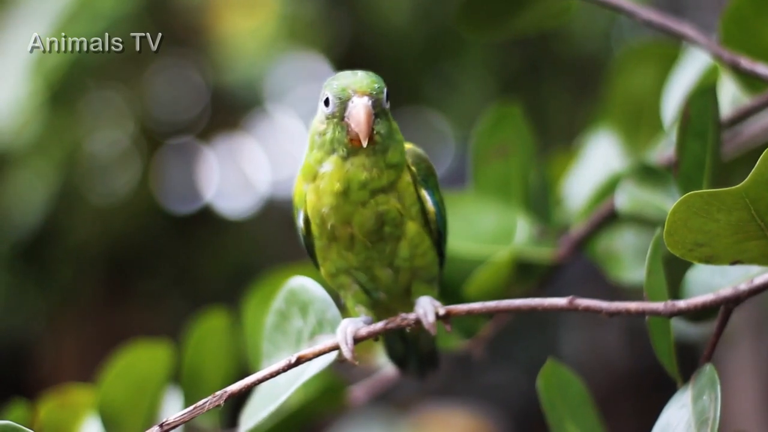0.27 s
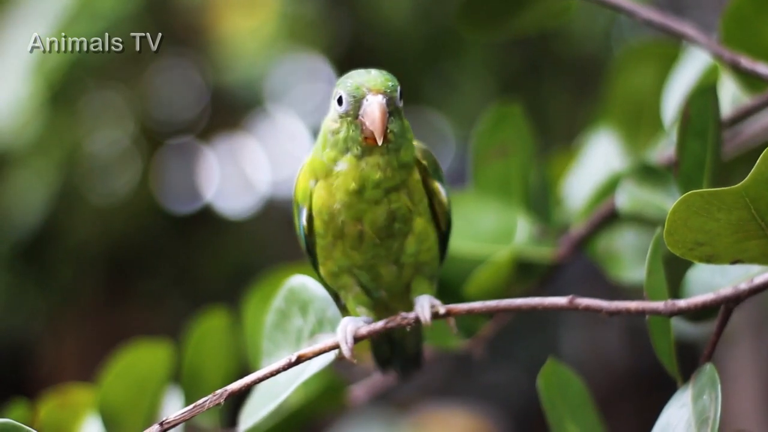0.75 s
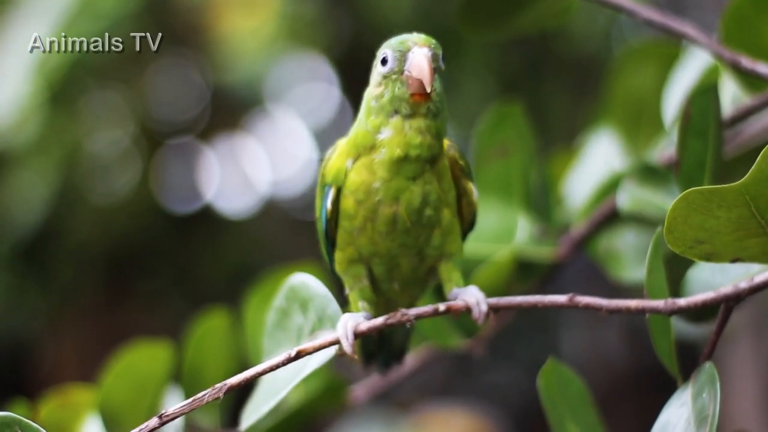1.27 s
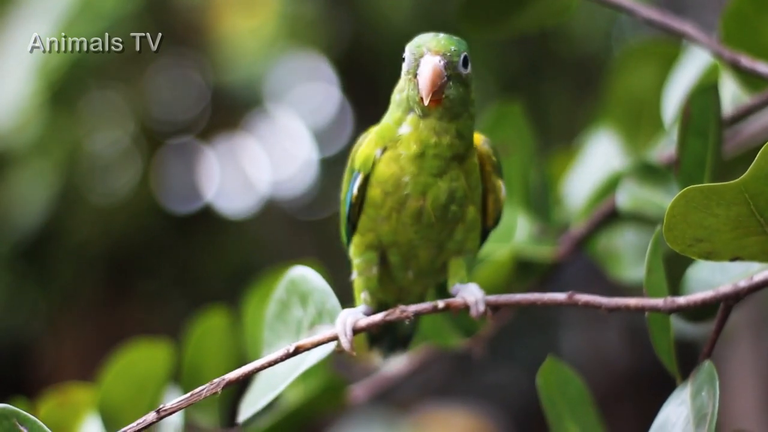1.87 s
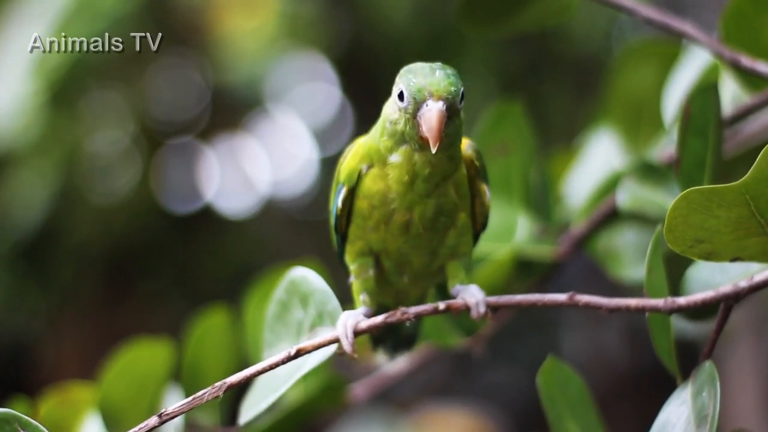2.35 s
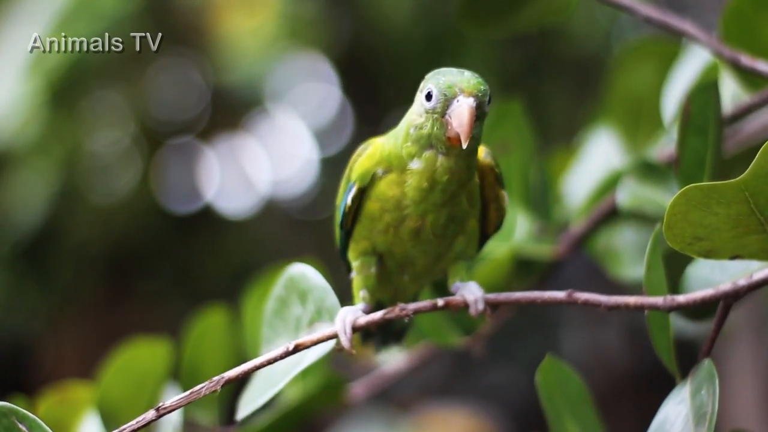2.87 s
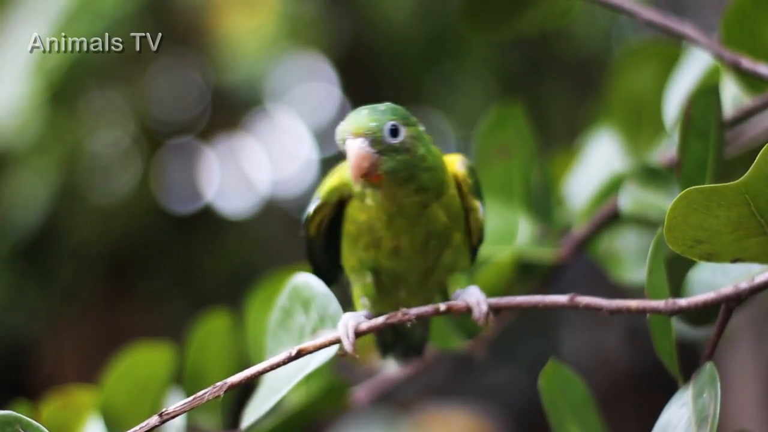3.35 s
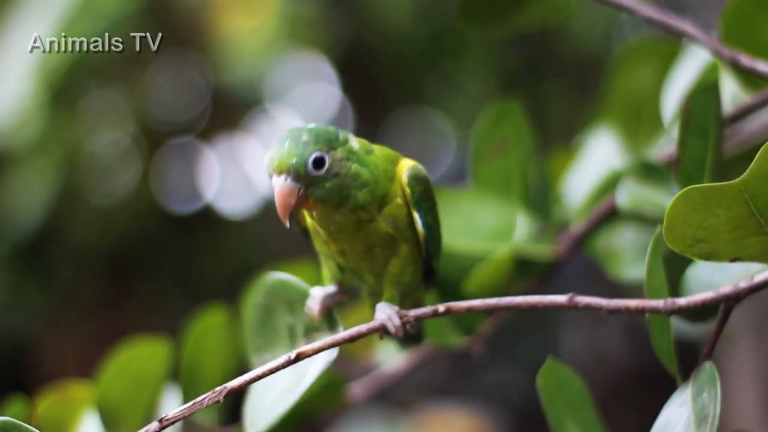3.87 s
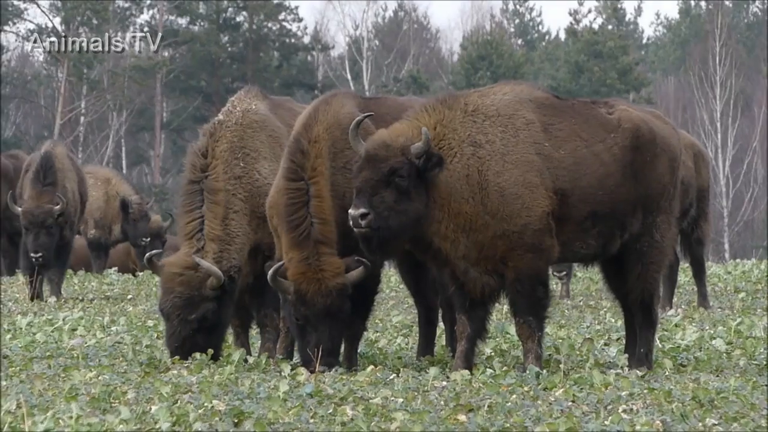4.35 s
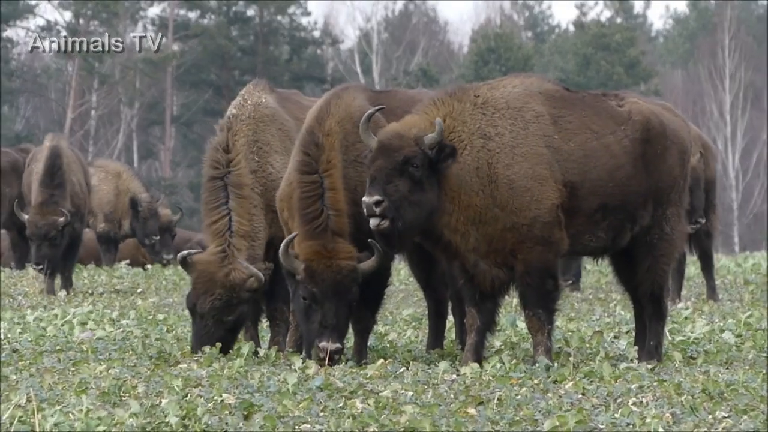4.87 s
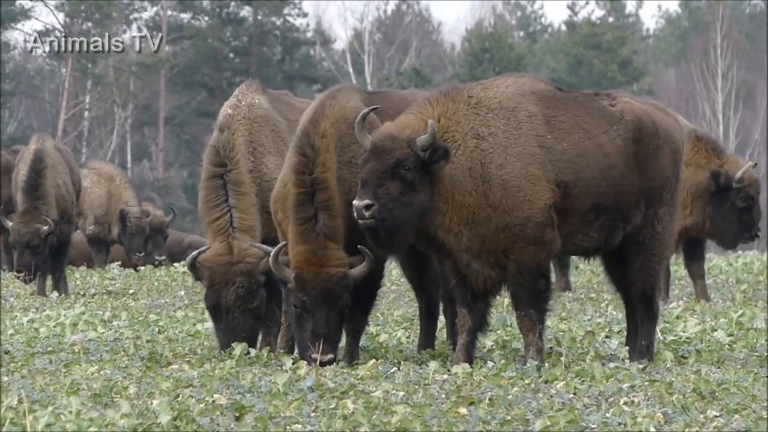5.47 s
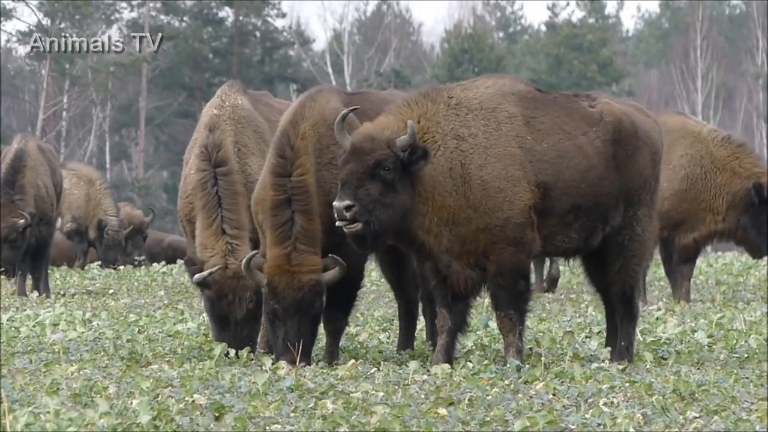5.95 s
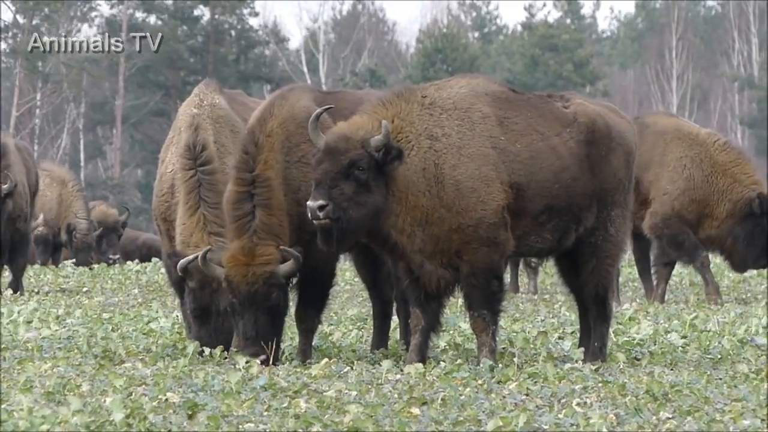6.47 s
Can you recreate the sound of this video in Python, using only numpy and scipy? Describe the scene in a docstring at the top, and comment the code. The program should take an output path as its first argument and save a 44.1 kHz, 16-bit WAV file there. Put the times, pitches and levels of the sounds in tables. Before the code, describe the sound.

Steady leafy hiss with echoing bird whistles cuts to short low wind, then near silence broken by a soft rattling bison grunt and a loud cracking growl.

```python
"""Forest birds, then a grunting bison

Birds whistle and rasp in an echoing, hissing forest; it cuts abruptly to a short rush of wind, then a quiet field.
There a bison grunts twice: a soft rattle, then a loud growl that cracks at its peak through hard clipping.
Each grunt is a slow train of vocal-fold slaps ringing a long throat, plus noise for the rushing air.
Stems, steps and a mouth knock are damped bursts, whistles gliding sines; hiss, wind and field are coloured noise."""
import sys
import numpy as np
from scipy import signal
from scipy.fft import rfft, irfft
from scipy.io import wavfile
from scipy.ndimage import uniform_filter1d

SR = 44100
rng = np.random.default_rng(int(sys.argv[2]) if len(sys.argv) > 2 else 0)


def put_to_file(sound):
    """Save the sound as 16-bit audio at rate SR, in the file named by the first command-line argument."""
    columns = np.atleast_2d(sound).T  # one column per channel
    safe = np.clip(columns, -1, 1)
    whole_steps = np.round(safe * 32767)
    wavfile.write(sys.argv[1], SR, whole_steps.astype(np.int16))


N = 296079
T = np.arange(N) / SR


def amp(db):
    """Decibels to gain."""
    return 10 ** (np.asarray(db) / 20)


def unit(x):
    """Scales to rms 1."""
    return x / np.sqrt(np.mean(x ** 2) + 1e-20)


def follow(rows, t=T):
    """Reads every column of a curve table at the times t."""
    s, *columns = np.transpose(rows)
    return [np.interp(t, s, c) for c in columns]


def read(points, hz):
    """Reads a spectrum on a log-frequency axis."""
    f, value = np.transpose(points)
    return np.interp(np.log(hz + 1), np.log(f + 1), value)


def add(mix, s, sound):
    """Mixes a sound in at time s."""
    part = mix[..., round(s * SR):][..., :sound.shape[-1]]
    part += sound[..., :part.shape[-1]]


def between(start_s, end_s):
    """Gate open from start to end, with 2 ms edges."""
    return np.clip(np.minimum(T - start_s, end_s - T) / .002, 0, 1)


def held(t, top_db, from_s, until_s, rise_db_per_s, fall_db_per_s):
    """Level curve: climbs to the top, holds, then falls."""
    return top_db - rise_db_per_s * np.maximum(from_s - t, 0) - fall_db_per_s * np.maximum(t - until_s, 0)


def noise(spectrum):
    """Steady noise of a given colour."""
    colour = amp(read(spectrum, np.fft.rfftfreq(N, 1 / SR)))
    return unit(irfft(rfft(rng.standard_normal(N)) * colour, N))


def smooth_noise(samples):
    """Slow random curve of rms 1: noise under a moving average."""
    return unit(uniform_filter1d(rng.standard_normal(N), size=samples))


def band(x, lo_hz, hi_hz, order=2):
    """Band-pass."""
    edges_hz = [lo_hz, min(hi_hz, SR / 2 - 100)]
    return signal.sosfilt(signal.butter(order, edges_hz, "band", fs=SR, output="sos"), x)


def resonate(x, hz, width_hz):
    """Resonance that follows the curve hz, applied twice for steep skirts."""
    turn = np.exp(2j * np.pi * np.cumsum(hz) / SR)
    r = np.exp(-np.pi * width_hz / SR)
    return (turn * signal.lfilter([(1 - r) ** 2], [1, -2 * r, r * r], x / turn)).real


def echoes(x, t60_s):
    """Scattering from tree trunks: sparse reflections that die away."""
    t = T[:2 * SR]
    hits = rng.random(len(t)) < 2000 / SR  # about 2000 reflections per second
    taps = rng.standard_normal(len(t)) * hits * 10 ** (-3 * t / t60_s)
    return signal.fftconvolve(x, taps / np.linalg.norm(taps))[:N]


def snaps(rows):
    """Snaps and soft knocks: quickly dying bursts of uneven cracks."""
    out, t = np.zeros(N), T[:SR // 6]
    for s, db, lo_hz, hi_hz, decay_s in rows:
        cracks = rng.standard_normal(len(t)) * rng.random(len(t))
        gain = amp(db) / band(cracks, lo_hz, hi_hz).std()
        add(out, s, gain * band(cracks * np.exp(-t / decay_s), lo_hz, hi_hz))
    return out


def glides(rows):
    """Short pure tones that swell, glide and fade."""
    out = np.zeros(N)
    for s, length_s, start_hz, end_hz, db in rows:
        n = int(length_s * SR)
        phase = 2 * np.pi * np.cumsum(np.linspace(start_hz, end_hz, n)) / SR
        add(out, s, amp(db) * np.hanning(n) * np.sin(phase))
    return out


BOOM_JITTER = .025  # rms share by which the lowest resonance varies per slap
RING_SHAPE = 1.25  # exponent of the ring's decay
RAGGED_S = .006  # decay of the ragged fold contact
CHEST_HZ, CHEST_S = 108, .008
MOUTH_HZ = (820, 1330)  # band that the mouth lets out best
LEAD_S = .015  # each slap's waveform starts this early


def grunt(rate, course, airflow, throat, air_colour, second_width_hz, second_air_db, scatter, closing_s,
          contact_s, mouth_delay_s, overtone_db, chest_db, rebound, ragged, puff_depth, puff_lead_cycles,
          puff_sharpness, buzz, grain_db):
    """Slaps ring the throat until the next one damps it; air puffs through, chopped by the ringing."""
    start_s, end_s = rate[0][0], rate[-1][0]
    cycles = np.cumsum(follow(rate)[0] * (T >= start_s) * (T < end_s)) / SR
    slaps_s = T[np.searchsorted(cycles, np.arange(int(cycles[-1]) + 1), side="right")]
    since = T[:SR // 6]
    t = since - LEAD_S
    age, mouth_age = np.maximum(t - contact_s, 0), np.maximum(t - mouth_delay_s, 0)
    out, swing = np.zeros(N), np.zeros(N)

    # each slap also shakes the chest
    chest_fade = np.exp(-(age / CHEST_S) ** 2 - (np.minimum(t, 0) / (CHEST_S / 2)) ** 2)
    chest = amp(chest_db) * np.sin(2 * np.pi * CHEST_HZ * t) * chest_fade
    mode_hz, mode_width_hz, mode_db = np.transpose(throat)[:, :, None]

    for s, period_s in zip(slaps_s, np.diff(slaps_s, append=slaps_s[-1] + .078)):
        db, low_hz, ring_s, second_hz, second_db, mouth_db, tuning = follow(course, s)
        low_hz = low_hz * (1 + BOOM_JITTER * rng.standard_normal())

        # the flow shuts off smoothly and starts the lowest resonance; its lopsided swing adds an octave
        fade = np.exp(-(age / ring_s) ** RING_SHAPE) * (1 + np.tanh(t / closing_s + 1)) / 2
        angle = 2 * np.pi * low_hz * t
        boom = fade * (amp(overtone_db) * np.sin(2 * angle) - np.cos(angle))
        second_fade = np.exp(-np.pi * second_width_hz * age)
        second = amp(second_db) * np.sin(2 * np.pi * second_hz * age) * second_fade

        # the folds meet and ring the upper resonances, never twice alike
        drift, uneven = rng.standard_normal((2, len(mode_hz), 1))
        tuned_hz = mode_hz * tuning * (1 + scatter * drift)
        ring_fade = np.exp(-np.pi * mode_width_hz * mouth_age)
        ring = amp(mode_db + uneven / 2) * np.sin(2 * np.pi * tuned_hz * mouth_age) * ring_fade

        # they touch again, more lightly, on each later swing of the lowest resonance
        swings = np.diff(np.floor(low_hz * since), prepend=0)
        touches = rebound * swings * np.exp(-since / ring_s) * rng.uniform(.5, 1, len(t))
        touches[0] = 1
        # wet folds part and meet raggedly
        rough = unit(rng.standard_normal(len(t))) * np.exp(-since / RAGGED_S)
        touches += ragged * rough / np.sqrt(RAGGED_S * SR / 2)
        mouth = amp(mouth_db) * band(signal.fftconvolve(touches, ring.sum(0))[:len(t)], *MOUTH_HZ)

        damping = (1 - np.tanh((t - period_s) / closing_s + 1)) / 2
        add(out, s - LEAD_S, amp(db) * (chest + (boom + second + mouth) * damping))
        add(swing, s - LEAD_S, boom * damping)

    puff_angle = 2 * np.pi * (cycles + puff_lead_cycles)
    puffs = np.exp(puff_sharpness * (np.cos(puff_angle) - 1)) * between(start_s, end_s)
    grains = amp(grain_db * smooth_noise(130))
    throat_air = unit(resonate(rng.standard_normal(N), follow(course)[3], second_width_hz))
    air = unit((noise(air_colour) + amp(second_air_db) * throat_air) * grains)
    air = air * np.exp(buzz * swing) * (1 + puff_depth * puffs) / (1 + puff_depth / 3)
    return out + amp(held(T, *airflow)) * air


# narrow wheeze that sinks through the growl: (time [s], centre [Hz], level [dB])
WHEEZE_CURVE = [(5.08, 4900, -80), (5.12, 4850, -70), (5.16, 4650, -67), (5.24, 4600, -78)]
WHEEZE_WIDTH_HZ = 600  # of each of the two resonator passes


def wheeze():
    """Air whistles roughly through a narrow gap in the muzzle."""
    hz, db = follow(WHEEZE_CURVE)
    whistle = unit(resonate(rng.standard_normal(N), hz, WHEEZE_WIDTH_HZ))
    return amp(db) * whistle * between(WHEEZE_CURVE[0][0], WHEEZE_CURVE[-1][0])


# vocal-fold speed: (time [s], slap rate [1/s])
SOFT_SLAP_RATE = [(4.251, 24.42), (4.33, 29.81), (4.47, 29.15), (4.61, 24.56), (4.69, 19.05), (4.8, 17.55)]
LOUD_SLAP_RATE = [(5.0165, 33.64), (5.06, 53.05), (5.11, 60.92), (5.2, 48.44), (5.305, 39.84),
                  (5.345, 21.72), (5.45, 22.6), (5.55, 13.42), (5.68, 14.02)]
# course of each grunt: (time [s], effort [dB], lowest resonance [Hz], its ring time [s],
# second resonance [Hz], its level re slap [dB], upper resonances re slap [dB], their tuning [ratio])
SOFT_GRUNT_COURSE = [(4.251, -37, 160, .03, 600, -20, -9, 1), (4.29, -36, 168, .02, 620, -20, -7, 1),
                     (4.325, -40, 180, .014, 630, -20, -5, 1), (4.36, -33.5, 180, .009, 640, -20, -8, .95),
                     (4.46, -31.5, 194, .008, 640, -8, -1, 1), (4.57, -29.5, 192, .007, 610, -13, -5, 1.03),
                     (4.61, -28.5, 182, .007, 610, -16, -6, 1), (4.652, -29, 180, .011, 610, -17, -7, 1),
                     (4.702, -36, 175, .012, 620, -19, -7, 1.1),
                     (4.756, -36.5, 172, .02, 620, -24, -11, 1.1)]
LOUD_GRUNT_COURSE = [(5.017, -20, 198, .03, 520, -20, -8, .96),
                     (5.042, -13.5, 198, .014, 522, -16, -4, .98),
                     (5.08, -14.5, 192, .007, 525, -18, 2.5, .99),
                     (5.15, -14.5, 196, .007, 505, -25, 2.5, 1.02),
                     (5.187, -11, 190, .007, 495, -27, 2, 1.03),
                     (5.207, -9.8, 195, .022, 490, -22, 2.5, 1.01),
                     (5.229, -11, 184, .028, 490, -19, 5.5, 1.02),
                     (5.274, -10, 170, .03, 520, -27, 3.5, 1.01), (5.298, -9.5, 165, .022, 540, -32, 0, 1),
                     (5.325, -18, 168, .05, 570, -26, 0, 1), (5.367, -12, 158, .024, 585, -24, -9, .99),
                     (5.412, -22, 140, .05, 585, -26, -3, .96), (5.457, -21, 130, .014, 585, -16, -9, .98),
                     (5.508, -21, 112, .009, 595, -24, -2, .86), (5.576, -33, 100, .008, 600, -26, -16, .9),
                     (5.65, -37, 100, .008, 600, -26, -16, .9)]
# rushing-air level: (held level [dB], from [s], until [s], rise [dB/s], fall [dB/s])
SOFT_AIRFLOW = (-51.5, 4.25, 4.6, 430, 50)
LOUD_AIRFLOW = (-37, 5.03, 5.36, 420, 105)
SIZZLE_AIRFLOW = (-63, 5.35, 5.39, 75, 130)
# upper throat resonances before tuning: (frequency [Hz], width [Hz], relative level [dB])
SOFT_THROAT_MODES = [(1010, 190, 1), (1290, 190, -2.5)]
LOUD_THROAT_MODES = [(945, 45, -18), (1080, 300, -2.8), (1135, 50, -13)]
# colour of air past the folds: (frequency [Hz], relative density [dB])
SOFT_AIR_COLOUR = [(150, -22), (400, -22), (620, -6), (770, -10), (1040, 3), (1400, -1), (1800, 1),
                   (2250, -6), (2750, -12.5), (3300, -13), (4300, -22), (5000, -20), (6500, -35),
                   (12000, -63)]
LOUD_AIR_COLOUR = [(120, -25), (270, 6), (400, 1), (525, -4), (680, -20), (930, 0), (1150, 1), (1380, -11),
                   (1520, -22), (1740, -15), (2000, -26), (2400, -22), (3500, -37), (6000, -56.5),
                   (14000, -74.5)]
# thin hiss between tongue and teeth: (frequency [Hz], relative density [dB])
SIZZLE_COLOUR = [(1500, -23), (3000, 7.5), (3800, 4), (4200, -2), (4700, 1), (5600, -3), (9000, -13),
                 (13000, -15), (15000, -32)]
# throat hums as the folds draw together: (time [s], length [s], start [Hz], end [Hz], level [dB])
THROAT_HUMS = [(4.19, .075, 70, 150, -49), (4.995, .034, 165, 190, -30)]


def bison(echo_db=-31, echo_t60_s=1.5, radiation_hz=50):
    """Two grunts, answered faintly by the edge of the wood."""
    soft = grunt(SOFT_SLAP_RATE, SOFT_GRUNT_COURSE, SOFT_AIRFLOW, SOFT_THROAT_MODES, SOFT_AIR_COLOUR,
                 second_width_hz=40, second_air_db=-10, scatter=.04, closing_s=.002, contact_s=.002,
                 mouth_delay_s=.0012, overtone_db=-40, chest_db=-21, rebound=.4, ragged=.35,
                 puff_depth=1.4, puff_lead_cycles=0.0, puff_sharpness=2.8, buzz=.5, grain_db=2.5)
    loud = grunt(LOUD_SLAP_RATE, LOUD_GRUNT_COURSE, LOUD_AIRFLOW, LOUD_THROAT_MODES, LOUD_AIR_COLOUR,
                 second_width_hz=22, second_air_db=-10, scatter=.012, closing_s=.0011, contact_s=.0008,
                 mouth_delay_s=.0004, overtone_db=-15, chest_db=-17, rebound=.35, ragged=.12,
                 puff_depth=.6, puff_lead_cycles=-.2, puff_sharpness=1.0, buzz=.6, grain_db=1.5)
    sizzle = noise(SIZZLE_COLOUR) * amp(held(T, *SIZZLE_AIRFLOW))
    voice = soft + loud + glides(THROAT_HUMS) + wheeze() + sizzle
    # the mouth is too small to radiate the deepest bass
    voice = signal.sosfiltfilt(signal.butter(2, radiation_hz, "high", fs=SR, output="sos"), voice)
    return voice + amp(echo_db) * echoes(voice, echo_t60_s)


# hoof steps: (time [s], level [dB], thud pitch [Hz], decay [s])
HOOF_STEPS = [(6.114, -38, 620, .0018), (6.362, -41, 160, .011)]


def hooves():
    """Each step is one quickly damped knock on the ground."""
    out, t = np.zeros(N), T[:SR // 6]
    for s, db, hz, decay_s in HOOF_STEPS:
        add(out, s, amp(db) * np.sin(2 * np.pi * hz * t) * np.exp(-t / decay_s))
    return out


# stems and leaves snapping, and the low knock of the mouth opening as the soft grunt starts (4.25 s):
# (time [s], level [dB], lowest [Hz], highest [Hz], decay [s])
CRACKLES_AND_KNOCK = [(3.987, -51, 400, 2800, .003), (4.174, -59, 900, 2600, .005),
                      (4.25, -41, 400, 850, .005), (4.882, -54, 496, 2170, 0.0041),
                      (4.903, -61, 1500, 7060, 0.00091), (6.114, -49, 450, 2800, .006),
                      (6.13, -52, 450, 3300, .007), (6.358, -52, 500, 3200, .012),
                      (6.386, -55, 350, 2800, .009), (6.407, -55, 500, 3000, .005),
                      (6.449, -45.5, 2500, 13000, 0.00048)]


def crackles_and_mouth_knock():
    """Stems and leaves snap as the herd grazes, and the mouth knocks open: short band-limited bursts."""
    return snaps(CRACKLES_AND_KNOCK)


# bird whistles: (time [s], length [s], start [Hz], end [Hz], level before echoes [dB], left re right [dB])
BIRD_WHISTLES = [(0.194, 0.16, 1526, 1772, -42, 6.5), (0.341, .2, 1985, 1990, -31, 3.5),
                 (0.442, 0.13, 2130, 1995, -33.5, 2), (0.629, 0.13, 2325, 2300, -29, 5),
                 (.74, .1, 2300, 2292, -35, 4), (.69, 0.14, 1560, 1355, -41, -3),
                 (1.045, 0.115, 1875, 1915, -28.5, 4), (1.137, 0.078, 1933, 1972, -23.3, 6),
                 (1.255, 0.12, 1752, 1725, -32, -6), (1.45, .1, 1705, 1735, -36, -4),
                 (1.362, .12, 2072, 2123, -25, 1.5), (1.581, 0.09, 2153, 2084, -32, 4.5),
                 (1.82, 0.13, 2740, 2755, -31.5, 8), (1.93, 0.094, 2696, 2650, -36, 1.5),
                 (2.09, .12, 2668, 2620, -38, 1), (2.277, .08, 2115, 2114, -33, 5),
                 (2.347, 0.082, 2034, 2034, -33.5, 4), (2.55, .2, 2110, 2120, -41, 2)]
# raspy calls: (time [s], length [s], centre [Hz], half width [share of centre],
# level before echoes [dB], left re right [dB])
BIRD_RASPS = [(.53, .25, 3900, .07, -33.5, -4), (1.571, .27, 3866, .07, -37, -1),
              (2.501, .29, 3920, .07, -31.5, -2), (2.849, .8, 4900, .07, -43, 1),
              (3.48, .26, 3850, .12, -32.5, -1.5)]


def placed(sound, side_db, lag_samples=4):
    """Pans by level difference; the right channel lags a few samples."""
    return amp([[side_db / 2], [-side_db / 2]]) * [sound[0], np.roll(sound[1], lag_samples)]


def far_bird(call, direct_db, t60_s):
    """A call arrives weakly by the straight path and lingers among the trees."""
    dry_call = band(np.pad(call, (0, N - len(call))), 900, 9000)
    tails = np.array([unit(echoes(dry_call, t60_s)) for ear in range(2)]) * dry_call.std()
    return amp(direct_db) * dry_call + tails


def birds(waver=.011, flutter_db=2.5, whistle_direct_db=-2, rasp_direct_db=-5,
          whistle_t60_s=1.5, rasp_t60_s=1.43):
    """Gliding, nearly pure whistles and short harsh rasps of band-passed noise."""
    out = np.zeros((2, N))
    for s, length_s, start_hz, end_hz, db, side_db in BIRD_WHISTLES:
        n = int(length_s * SR)
        hz = np.linspace(start_hz, end_hz, n) * (1 + waver * smooth_noise(300)[:n])
        flutter = amp(flutter_db * smooth_noise(500)[:n])
        tone = np.sin(2 * np.pi * np.cumsum(hz) / SR) * signal.windows.tukey(n, .5)
        note = amp(db) * unit(flutter * tone)
        add(out, s, placed(far_bird(note, whistle_direct_db, whistle_t60_s), side_db))
    for s, length_s, hz, spread, db, side_db in BIRD_RASPS:
        n = int(length_s * SR)
        rasp = band(rng.standard_normal(N), hz * (1 - spread), hz * (1 + spread))[:n] * np.hanning(n)
        add(out, s, placed(far_bird(amp(db) * unit(rasp), rasp_direct_db, rasp_t60_s), side_db))
    return out


# twig snaps in the forest: (time [s], level [dB], lowest [Hz], highest [Hz], decay [s])
TWIG_SNAPS = [(.672, -25, 1000, 3200, .012), (2.718, -21.5, 2000, 4900, 0.0064)]


def twigs():
    """Snapping twigs: short band-limited bursts."""
    return snaps(TWIG_SNAPS)


# small ticks in the wind: (time [s], level [dB], lowest [Hz], highest [Hz], decay [s])
WIND_TICKS = [(3.714, -35, 380, 700, .008), (3.72, -37, 400, 1300, .045), (3.795, -44, 2950, 3300, .004),
              (3.868, -44, 3960, 4700, 0.0027), (3.913, -48, 7800, 8800, .002), (3.926, -39, 200, 300, .03)]
# small bird in the wind: (time [s], length [s], start [Hz], end [Hz], level [dB])
BIRD_PEEPS = [(3.841, .018, 2650, 2850, -37.5)]


def wind_details():
    """Noise-burst ticks and a gliding bird peep."""
    return snaps(WIND_TICKS) + glides(BIRD_PEEPS)


# wind colour: (frequency [Hz], relative density [dB])
WIND_COLOUR = [(15, -58.5), (25, -25), (86, -2), (176, -3), (264, 1), (354, -8), (769, -11.5),
               (1460, -18.5), (1630, -15.5), (4260, -21), (4870, -23), (8550, -24), (15000, -33)]
RUMBLE_DB, RUSTLE_DB, RUSTLE_FALL_START_S, RUSTLE_FALL_DB_PER_S = -44, -42, 3.73, 50


def wind(split_hz=400):
    """Coloured noise: a rumble that holds while its rustling top fades."""
    air = noise(WIND_COLOUR)
    low = signal.sosfiltfilt(signal.butter(2, split_hz, fs=SR, output="sos"), air)
    rustle_db = RUSTLE_DB - RUSTLE_FALL_DB_PER_S * np.maximum(T - RUSTLE_FALL_START_S, 0)
    return amp(RUMBLE_DB) * unit(low) + amp(rustle_db) * unit(air - low)


# forest air: (frequency [Hz], relative density [dB])
HISS_COLOUR = [(30, -49), (85, -63), (125, -50), (170, -28.5), (250, -15.5), (400, -4.5), (700, -1.5),
               (1100, -0.5), (2200, -1.5), (3500, -3), (5000, -6), (8000, -13), (12000, -22),
               (15000, -33.5)]
# left-right likeness: (frequency [Hz], correlation [-1..1])
HISS_LIKENESS = [(60, .7), (1000, .62), (1400, .5), (1800, .2), (2500, 0), (4500, -.17), (7000, -.04),
                 (15000, 0)]
FOREST_DB, FADE_IN_S, FADE_IN_DB = -29.75, .54, 6.4


def forest_hiss(patchy_db=1.13):
    """Distant leaves: wide, slightly patchy noise, alike in both channels mainly at long wavelengths."""
    frames, hz = N // 256 + 5, np.fft.rfftfreq(1024, 1 / SR)
    a, b, c, d, patches = rng.standard_normal((5, frames, len(hz)))
    same = read(HISS_LIKENESS, hz)
    left = a + 1j * b
    right = same * left + np.sqrt(1 - same ** 2) * (c + 1j * d)
    patches = unit(uniform_filter1d(uniform_filter1d(patches, size=14, axis=0), size=14, axis=1))
    spectra = np.array([left, right]) * amp(read(HISS_COLOUR, hz) + patchy_db * patches)
    hiss = unit(signal.istft(spectra.swapaxes(1, 2), nperseg=1024, noverlap=768)[1][:, :N])
    return hiss * amp(FOREST_DB - FADE_IN_DB * np.maximum(1 - T / FADE_IN_S, 0))


# field air: (frequency [Hz], relative density [dB])
FIELD_COLOUR = [(25, -3), (60, -3), (170, -1), (300, -5), (600, -7), (1000, -11), (2000, -20), (4000, -28),
                (8000, -35), (12000, -38), (15000, -44)]
# swell while the bison calls: (held level [dB], from [s], until [s], rise [dB/s], fall [dB/s])
FIELD_AIR_SWELL = (-57.5, 5.2, 5.7, 9, 17)
FIELD_REST_DB, WHINE_HZ, WHINE_DB = -63, 12950, -87


def field():
    """Open air as coloured noise, with a very faint high whine of narrow noise."""
    whine = unit(band(rng.standard_normal(N), WHINE_HZ - 40, WHINE_HZ + 40))
    air_db = np.maximum(FIELD_REST_DB, held(T, *FIELD_AIR_SWELL))
    return noise(FIELD_COLOUR) * amp(air_db) + amp(WHINE_DB) * whine


FOREST_END_S, WIND_END_S, FIELD_START_S, FIELD_END_S = 3.653, 3.961, 3.981, 6.607
LULL_DB = -9  # short lull between wind and field


def scene():
    """Forest in stereo, then wind and pasture in the centre."""
    pasture = bison() + hooves() + crackles_and_mouth_knock() + field()
    pasture = pasture * amp(LULL_DB * (T < FIELD_START_S))
    forest = birds() + twigs() + forest_hiss()
    gust = wind_details() + wind()
    return (forest * between(0, FOREST_END_S) + gust * between(FOREST_END_S, WIND_END_S)
            + pasture * between(WIND_END_S, FIELD_END_S))


CLIP_LEVEL, EDGE_HZ = .492, 15300


def record(dry):
    """Hard clipping makes the hardest slaps crack; then a low-pass limits the band."""
    clipped = np.clip(dry, -CLIP_LEVEL, CLIP_LEVEL)
    lowpass = signal.firwin(511, EDGE_HZ, window=("kaiser", 9), fs=SR)
    return signal.oaconvolve(clipped, lowpass[None], "same")


dry = scene()
out = record(dry)
put_to_file(out)
```